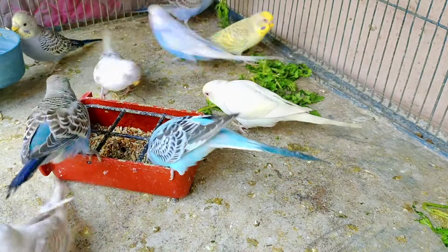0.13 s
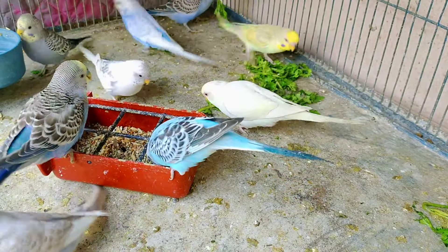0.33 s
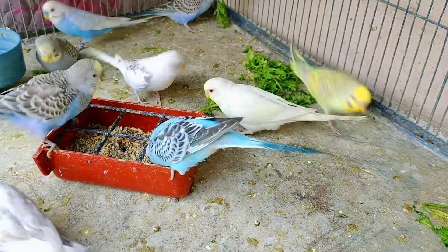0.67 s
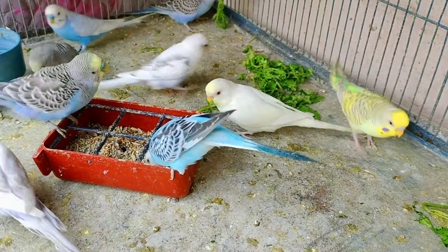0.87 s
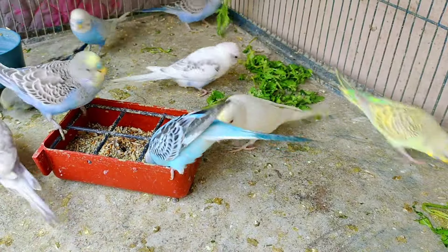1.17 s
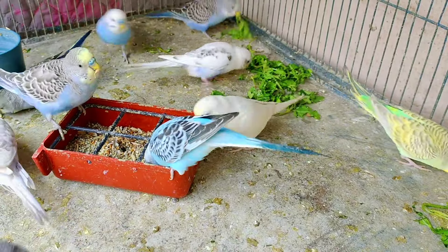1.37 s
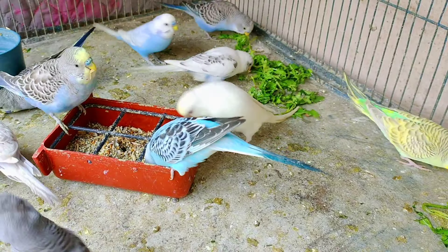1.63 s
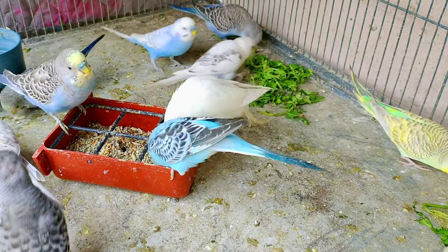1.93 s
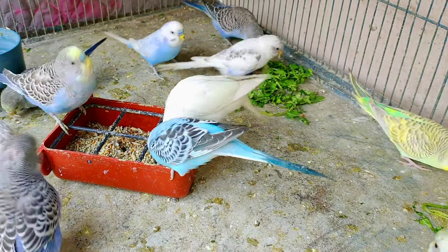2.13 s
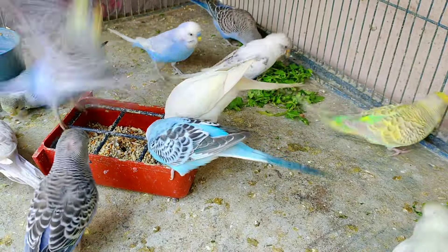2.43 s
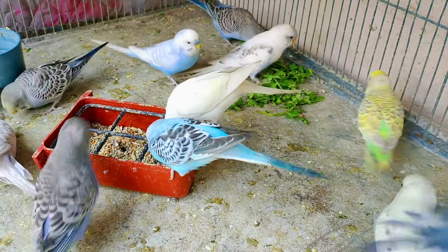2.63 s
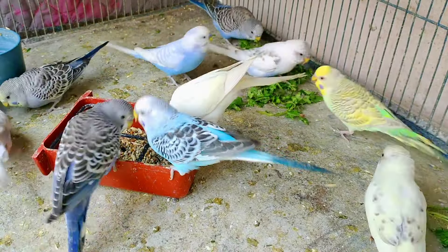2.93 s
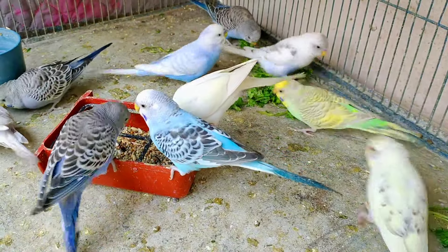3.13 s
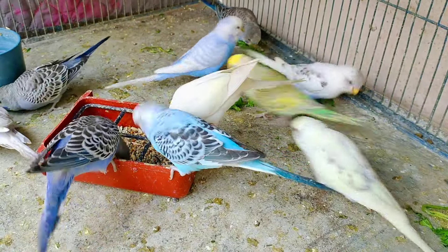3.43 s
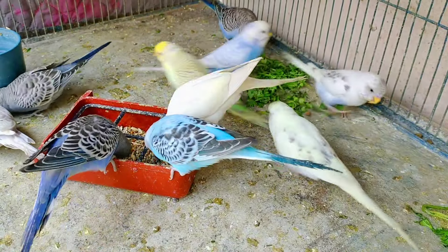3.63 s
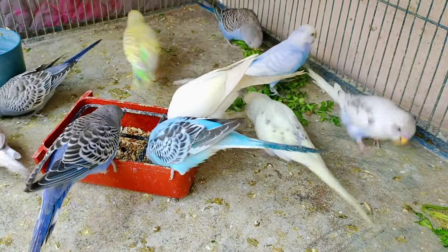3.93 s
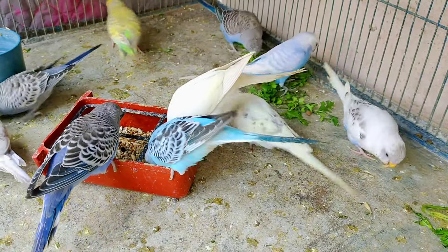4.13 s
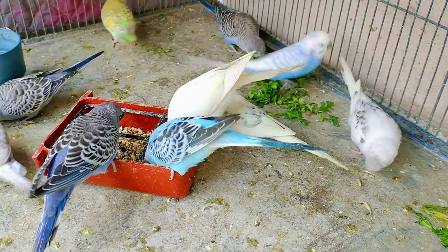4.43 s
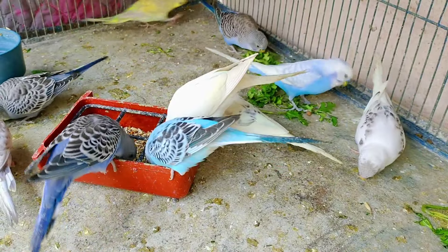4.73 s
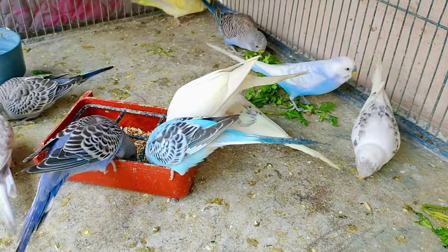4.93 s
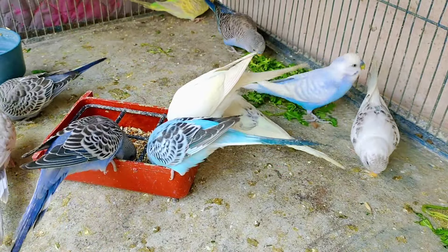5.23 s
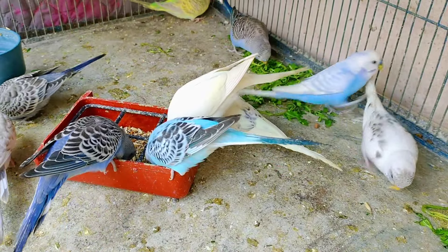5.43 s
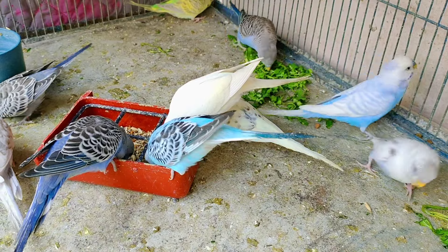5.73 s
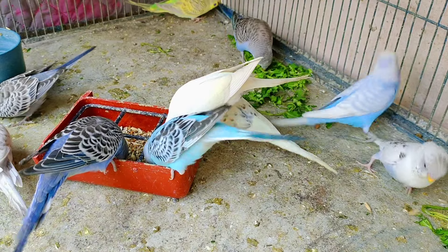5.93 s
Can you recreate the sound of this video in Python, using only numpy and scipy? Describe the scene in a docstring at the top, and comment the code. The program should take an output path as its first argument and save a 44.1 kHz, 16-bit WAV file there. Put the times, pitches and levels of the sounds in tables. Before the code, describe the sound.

Budgerigars feed close to the microphone in a small aviary with slight reverberation and faint, bassy outdoor air. At 0 s the tail of a distant rooster's crow fades under a beak knock. Irregular taps on a plastic tray continue, most steadily from 0.3 to 1.6 s, with seed rustling and faint hoarse bird calls far away. Husks crackle around 1.7 s and a sharp knock lands at 1.9 s; then it is sparser. Around 2.6-3.1 s wings whirr and thump softly as a bird lands, amid stirred seed and firmer pecks. A quick raspy chirp comes at 3.35 s. Crisp husk cracks cluster at 3.5-3.7 s, with the loudest snap at 4.0 s. A brighter, sharper chirp follows at 4.45 s. From 4.6 to 5.8 s a rooster crows faintly over dwindling pecks and ticks. A last knock at 5.9 s meets a tiny chirp.

```python
"""In an aviary with a concrete floor, budgerigars feed from a plastic seed tray.
Beaks knock and husks crack: grains and noise bursts through short resonances.
Feet stir seed (drifting spurts of clicks), wings whirr past (pulsed, filtered noise).
One bird chirps close by; far off, birds call hoarsely and a rooster crows (gliding harmonic tones)."""
import sys
import numpy as np
from scipy import signal
from scipy.fft import rfft, irfft
from scipy.io import wavfile
from scipy.ndimage import uniform_filter1d

SR = 44100
rng = np.random.default_rng(int(sys.argv[2]) if len(sys.argv) > 2 else 0)


def master_out(mix):
    """Clip the mix to full scale and print it as 16-bit PCM to the path in sys.argv[1]."""
    frames = np.transpose(np.atleast_2d(mix))
    ceiling = np.clip(frames, -1, 1)
    pcm = np.round(ceiling * 32767).astype(np.int16)
    wavfile.write(sys.argv[1], SR, pcm)


N = 268921
TIME = np.arange(N) / SR


def undb(db):
    """Decibels to amplitude gain."""
    return 10 ** (np.asarray(db) / 20)


def unit(x):
    """Scale to rms 1."""
    return x / np.sqrt(np.mean(x ** 2) + 1e-20)


def add(out, start_s, sound):
    """Mix a short sound in at start_s."""
    start = max(int(start_s * SR), 0)
    out[start:start + len(sound)] += sound[:N - start]


def noise(size=N):
    """White noise, rms about 1."""
    return rng.standard_normal(size)


def decay(t, t60_s):
    """Exponential decay: 60 dB in t60_s."""
    return np.exp(-np.log(1000) * t / t60_s)


def low_pass(x, hz, order):
    """Butterworth low-pass."""
    return signal.sosfilt(signal.butter(order, hz, fs=SR, output="sos"), x)


def colour(x, spectrum):
    """Minimum-phase filter through the (hz, db) points, unit power gain."""
    hz, db = np.transpose(spectrum)
    f = np.fft.rfftfreq(4096, 1 / SR)
    gain_db = np.interp(np.log(f + 1), np.log(hz), db)
    gain_db -= 11.0 * np.log2(np.maximum(f / hz[-1], 1))  # per octave above the last point
    cepstrum = irfft(np.log(undb(gain_db)))
    half = len(cepstrum) // 2
    cepstrum[1:half] *= 2  # fold to make it causal
    cepstrum[half + 1:] = 0
    response = irfft(np.exp(rfft(cepstrum)))
    return signal.fftconvolve(x, response / np.linalg.norm(response))[:N]


def wander(hz, size=N):
    """Smooth random curve, rms 1, changing about hz times a second."""
    k = max(int(SR / hz), 2)
    return unit(uniform_filter1d(uniform_filter1d(noise(size), k), k))


def grains(rate_hz, spread_db, size=N):
    """Random tiny clicks of uneven size, rms 1."""
    strength = undb(spread_db * np.minimum(rng.exponential(size=size), 4))
    return unit((rng.random(size) < rate_hz / SR) * strength * noise(size))


def burst(t60_s, rise_s):
    """Quarter-second envelope: quick rise, exponential decay."""
    t = TIME[:SR // 4]
    return (1 - np.exp(-t / rise_s)) * decay(t, max(t60_s, .005))


def envelope(t, length_s, attack_s, release_s):
    """Linear rise, hold until length_s, exponential release."""
    return np.clip(t / attack_s, 0, 1) * np.exp(-np.clip((t - length_s) / release_s, 0, 20))


def ring(x, hz, width_hz):
    """One resonance with unit power gain."""
    hz = min(hz, .4 * SR)
    b, a = signal.iirpeak(hz, hz / width_hz, SR)
    return signal.lfilter(b, a, x + 1e-18) * np.sqrt(SR / np.pi / width_hz)


def spot(x, t60_s):
    """Random ring, at most 25 ms: the chance response of one seed or spot on the tray."""
    t = TIME[:SR // 40]
    response = noise(len(t)) * decay(t, t60_s)
    return signal.fftconvolve(x, response / np.linalg.norm(response))[:len(x)]


def room(x, t60_s, wet_db, top_hz):
    """Direct sound plus a diffuse, duller tail from 4 ms on."""
    t = TIME[:SR]
    tail = low_pass(noise(SR) * decay(t, t60_s) * (t > .004), min(top_hz, SR / 3), order=1)
    wet = undb(wet_db)
    reverb = signal.fftconvolve(x, tail / np.linalg.norm(tail))[:N]
    return (x + wet * reverb) / np.sqrt(1 + wet ** 2)


DULLING = 0.16  # share of the fade added per octave of partial number


def syrinx(notes, shape, partials_db, throat, waver_db, flutter_hz, jitter, shimmer):
    """Harmonics through a throat; the period glides fast, then settles; roughness shakes pitch and level."""
    out, t = np.zeros(N), TIME[:SR]
    glide_s, attack_s, release_s = shape
    throat_hz, throat_db = np.transpose(throat)
    for start_s, length_s, start_hz, end_hz, level_db, fade_db, roughness in notes:
        held = np.minimum(t, length_s)
        settled = np.expm1(-held / glide_s) / np.expm1(-length_s / glide_s)
        hz = 1 / ((1 - settled) / start_hz + settled / end_hz)
        shaken_hz = hz * (1 + jitter * roughness * wander(flutter_hz, size=SR))
        phase = 2 * np.pi * np.cumsum(shaken_hz) / SR
        fade = fade_db * held / length_s
        gains = []
        for number, partial_db in enumerate(partials_db, start=1):
            gain_db = partial_db + np.interp(number * hz, throat_hz, throat_db)
            gain_db = gain_db + DULLING * fade * np.log2(number)
            gain_db = gain_db + waver_db * wander(2 / glide_s, size=SR)  # each partial wavers alone
            gains.append(undb(gain_db))
        gains = np.array(gains) / np.linalg.norm(gains, axis=0)
        tone = unit(sum(gain * np.sin(number * phase) for number, gain in enumerate(gains, start=1)))
        strength = undb(level_db + fade) * envelope(t, length_s, attack_s, release_s)
        add(out, start_s, tone * strength * (1 + shimmer * roughness * wander(flutter_hz, size=SR)))
    return out


# beak pecks, body and edge relative to level: start_s, level_db, body_db, edge_db, scatter_t60_s
BEAK_PECKS = [(.003, -30.5, -1.5, -19, 0.033), (0.323, -43.5, -22, -6, 0.1), (.379, -40.5, 0, -7.5, 0.094),
              (.468, -51, 2, 6, .06), (.52, -46.5, -8, -33, 0.15), (0.614, -43, 0, -7, 0.061),
              (0.743, -36.5, -21, -10, 0.088), (0.834, -29, -4, -5.5, 0.072),
              (0.922, -42.5, 2.5, -3.5, 0.12), (1.0, -42.5, 5.5, -33, 0.045), (1.069, -38.5, -2, -36, .07),
              (1.103, -38.5, 2, -33, 0.12), (1.194, -44.5, -2, 0, 0.03), (1.253, -44.5, 0, -9, 0.079),
              (1.315, -43, 1, -39, 0.081), (1.341, -44, 11.5, -36, 0.13), (1.354, -36, -2, -45, 0.053),
              (1.489, -42, 1.5, -8, 0.085), (1.622, -51.5, -6.5, -24, 0.25), (1.864, -42, -33, -20, 0.058),
              (1.912, -26, -25, -33, 0.021), (1.944, -41.5, -5, 3.5, 0.019), (2.333, -55, -17, 5, 0.07),
              (2.542, -44, -11, -24, 0.19), (2.597, -46.5, 14, 1, 0.16), (2.643, -44, 1.5, 1.5, 0.17),
              (2.803, -38.5, -1, -3, 0.18), (2.863, -27.5, -5.5, -4, 0.079), (2.972, -44, 11, -17, 0.098),
              (3.112, -44, 0, -18, 0.086), (3.148, -29, -40, -23, 0.038), (3.207, -44, -3, 4, 0.047),
              (3.245, -27.5, -18.5, -39, 0.047), (3.582, -38.5, -1, -16, 0.18),
              (3.675, -32.5, -13.5, -42.5, 0.044), (3.811, -38.5, -7, -15, 0.042),
              (3.855, -35, -5, -10.5, 0.077), (3.909, -41.5, 1, -27, 0.075), (4.004, -33.5, -2, -26, 0.14),
              (4.09, -38, -1.5, -9, .086), (4.146, -49, 10, -38, 0.047), (4.165, -57, -7, -19, 0.017),
              (4.188, -38, -28, -20, 0.032), (4.237, -37.5, 0.5, 1, 0.043), (4.289, -41, 6, -12, 0.055),
              (4.808, -40.5, -6.5, -10, 0.094), (4.837, -38, -2, -5, 0.054), (4.936, -39.5, 0, -8.5, 0.055),
              (4.957, -34.5, -0.5, -9.5, 0.046), (4.984, -40, 3.5, -6, 0.067),
              (5.029, -38, -3.5, -40, 0.069), (5.171, -45, -22, -13.5, 0.28), (5.332, -36, -21, -21, 0.084),
              (5.441, -45, -12.5, -7, 0.25), (5.864, -30, -5, -47, 0.064)]
# tray resonances: centre_hz, width_hz, relative_db
TRAY_MODES = [(1381, 40, 7), (1740, 720, -21.5), (2244, 240, 3.5), (2537, 120, 3.5), (2865, 93, 7.5),
              (3260, 220, 3), (3880, 220, -16.5)]
# knock spectrum: hz, db_per_hz
PECK_SPECTRUM = [(600, -33.5), (1100, -2.5), (2000, 14), (3300, 6.5), (4300, 13), (5500, -19.5),
                 (8000, -52.5)]
# tray body spectrum: hz, db_per_hz
BODY_SPECTRUM = [(150, -10.5), (350, 1), (700, 14), (1000, 6), (1600, -39)]
# bright seed edge spectrum, also for stirred seed: hz, db_per_hz
EDGE_SPECTRUM = [(3000, -27), (4800, 11), (6500, 14), (7500, 11.5), (9000, -35.5)]
KNOCK_HZ, KNOCK_SPREAD_OCT = 2210, 0.56  # each peck lands on another spot of the tray


def pecks(knock_db=-5, body_db=-4, edge_db=-4, tray_db=-5, pitch_db=-4, pitch_width_hz=350):
    """Each peck scatters seeds against the tray, which rings briefly."""
    knock, pitched, body, edge = np.zeros((4, N))
    for start_s, level_db, peck_body_db, peck_edge_db, t60_s in BEAK_PECKS:
        hz = KNOCK_HZ * 2 ** (KNOCK_SPREAD_OCT * rng.standard_normal())
        shape = burst(t60_s, rise_s=0.0025)
        seeds = grains(rate_hz=9000, spread_db=3.3, size=len(shape)) * shape * undb(level_db)
        blow = spot(seeds, t60_s=.011)
        add(knock, start_s, blow)
        add(pitched, start_s, ring(seeds, hz, pitch_width_hz))
        add(body, start_s, seeds * undb(peck_body_db))
        add(edge, start_s, blow * undb(peck_edge_db))
    tray = sum(undb(db + tray_db) * ring(knock, hz, width_hz) for hz, width_hz, db in TRAY_MODES) / 2
    # soft plastic passes little treble; the hard seed adds a bright edge
    middle = low_pass(colour(knock, PECK_SPECTRUM) + tray + undb(pitch_db) * pitched, 4700, order=5)
    low = undb(body_db) * colour(body, BODY_SPECTRUM)
    bright = undb(edge_db) * colour(edge, EDGE_SPECTRUM)
    return undb(knock_db) * middle + low + bright


# cracking husks, snap relative to splinters: start_s, splinters_db, snap_db, ring_hz
HUSK_CRACKS = [(0.103, -45, 0, 6600), (.191, -32, -6, 6360), (0.232, -35.5, 0, 4300), (0.549, -42, 8, 6560),
               (1.461, -48, 3, 6700), (1.661, -31.5, -6, 5650), (1.765, -38, -5, 5570),
               (1.785, -30.5, -11, 6140), (1.811, -36.5, -3, 6200), (2.061, -49, 5, 6200),
               (2.135, -43, -11, 5860), (2.396, -50.5, -7, 5640), (2.441, -47, -9, 6030),
               (2.474, -51.5, -3, 6730), (2.972, -38.5, 12.5, 3600), (3.05, -40, -4, 6470),
               (3.316, -40, -2, 3700), (3.52, -26, 14.5, 6330), (3.56, -35, -3, 3760),
               (3.591, -30.5, -1, 6470), (3.621, -28, 3, 6540), (3.684, -31, -2, 6980),
               (3.73, -27.5, 4.5, 6830), (4.003, -16.5, 8.5, 3460), (4.219, -43.5, 9, 5830),
               (4.286, -33, -6, 5560), (4.63, -37, -5, 5700), (4.77, -33, 17, 6000),
               (5.224, -40.5, 20.5, 6330), (5.458, -48, -3.5, 4630), (6.063, -43, 23, 5200)]
# splitting husk spectrum: hz, db_per_hz
HUSK_SPECTRUM = [(800, -13), (2000, -8.5), (3500, -2.5), (6500, -1.5), (7500, -4.5), (9000, -20.5)]
SPLINTER_T60_S = 0.05
SHELL_CUT = 0.37  # a small shell radiates little below this share of its ring pitch


def husks(crack_db=-6, ring_db=-5, ring_width_hz=400):
    """A husk splits with one broad snap and a short run of thin splinters; the shell rings."""
    cracks, shells = np.zeros((2, N))
    shape = burst(SPLINTER_T60_S, rise_s=0.0025)
    click = burst(0.004, rise_s=0.0011)
    for start_s, splinters_db, snap_db, ring_hz in HUSK_CRACKS:
        snap = undb(splinters_db + snap_db) * click * noise(len(click))
        splinters = undb(splinters_db) * shape * grains(rate_hz=4700, spread_db=-0.5, size=len(shape))
        high_pass = signal.butter(2, SHELL_CUT * ring_hz, "high", fs=SR, output="sos")
        add(cracks, start_s, snap + signal.sosfilt(high_pass, spot(splinters, t60_s=.006)))
        add(shells, start_s, ring(snap + splinters, ring_hz, ring_width_hz))
    return undb(crack_db) * (colour(cracks, HUSK_SPECTRUM) + undb(ring_db) * shells)


# bouts of seed stirred by feet and beaks: start_s, length_s, level_db, treble_db
STIR_BOUTS = [(0, 0.26, -51, -56), (0.362, 0.37, -52, -58), (0.706, 0.25, -48.5, -60),
              (1.003, .3, -54, -73), (1.608, .29, -59.5, -55), (2.536, 0.11, -45, -66),
              (2.698, 0.18, -42, -43.5), (2.954, 0.046, -53, -65), (3.126, .11, -46, -65),
              (3.332, .22, -50, -47), (3.6, 0.21, -52, -75), (3.825, 0.44, -55.5, -64),
              (4.077, .3, -47.5, -61), (4.507, 0.28, -56, -63), (4.777, 0.29, -59, -80),
              (5.741, 0.17, -52.5, -58), (6, .12, -65, -64)]
# stirred seed spectrum, also for brushed feathers: hz, db_per_hz
STIR_SPECTRUM = [(150, -3.5), (400, -8), (750, 4), (1200, 2), (2600, 3.5), (3800, -3.5), (5000, -7.5),
                 (8000, -10)]
STIR_ATTACK_S, STIR_RELEASE_S = 0.0087, 0.019


def stirring(mid_db=-3, treble_db=-3, ring_db=-11, ring_width_hz=260, spot_count=10):
    """Loose seed shifts in small spurts, now at one spot, now at another, each with its own pitch."""
    middle, treble = np.zeros((2, N))
    for start_s, length_s, level_db, high_db in STIR_BOUTS:
        bout = envelope(TIME - start_s, length_s, STIR_ATTACK_S, STIR_RELEASE_S)
        middle += undb(level_db) * bout
        treble += undb(high_db) * bout
    turns = [undb(16 * wander(25)) for _ in range(spot_count)]
    ticks = [spot(grains(rate_hz=1100, spread_db=3), t60_s=.018) for _ in turns]
    pitches_hz = np.geomspace(800, 7000, spot_count) * (1 + .06 * noise(spot_count))
    spurts = np.zeros(N)
    for turn, tick, hz in zip(turns, ticks, pitches_hz):
        spurts += turn * (tick + undb(ring_db) * ring(tick, hz, ring_width_hz))
    swell = undb(11.0 * np.tanh(wander(40)))
    seeds = unit(spurts / np.linalg.norm(turns, axis=0) * swell)
    dull = colour(seeds * middle * undb(mid_db), STIR_SPECTRUM)
    return dull + colour(seeds * treble * undb(treble_db), EDGE_SPECTRUM)


# flurries of wing beats: start_s, length_s, air_db
WING_FLURRIES = [(0.214, .04, -55), (0.827, 0.15, -43), (1.016, 0.064, -49), (1.382, 0.029, -53),
                 (1.806, 0.032, -60), (2.4, 0.043, -67), (2.6, 0.19, -47), (2.737, 0.15, -37),
                 (2.918, 0.12, -41.5), (3.077, 0.17, -57), (3.44, 0.087, -60.5), (3.89, 0.036, -55),
                 (4.071, 0.032, -63), (4.237, 0.15, -45), (4.521, 0.15, -47.5), (4.704, 0.17, -62),
                 (4.987, 0.073, -64.5), (5.8, 0.028, -65.5)]
# pushed air spectrum: hz, db_per_hz
WING_SPECTRUM = [(25, -22.5), (60, -11.5), (90, 3), (120, 7.5), (155, 1.5), (195, 5), (280, -9),
                 (450, -18.5), (1000, -17.5), (2000, -51)]
# close wing strokes as a bird lands on the tray: start_s, level_db
CLOSE_STROKES = [(2.768, -25), (2.788, -28.5), (2.806, -24), (2.864, -26), (2.9, -32.5)]
# close stroke spectrum: hz, db_per_hz
STROKE_SPECTRUM = [(25, -4.5), (60, -10), (110, 5), (160, -4.5), (450, -1.5), (700, -9.5), (1500, -24)]
WING_ATTACK_S, WING_RELEASE_S = 0.029, 0.027


def wings(air_db=-1, mean_beat_hz=24, depth=0.31, feather_db=-17, stroke_db=-1, stroke_t60_s=0.093):
    """Every wing beat pushes a puff of air and brushes the feathers; the closest strokes thump."""
    effort = sum(undb(db) * envelope(TIME - start_s, length_s, WING_ATTACK_S, WING_RELEASE_S)
                 for start_s, length_s, db in WING_FLURRIES)
    beat_hz = mean_beat_hz * (1 + 0.0937 * wander(3.58))
    beat = unit(1 + depth * np.sin(2 * np.pi * np.cumsum(beat_hz) / SR))
    air = colour(noise(), WING_SPECTRUM) * beat * effort * undb(air_db)
    feathers = colour(noise(), STIR_SPECTRUM) * beat ** 2 * effort * undb(feather_db)
    strokes, puff = np.zeros(N), burst(stroke_t60_s, rise_s=0.0035)
    for start_s, level_db in CLOSE_STROKES:
        add(strokes, start_s, undb(level_db + stroke_db) * puff * noise(len(puff)))
    return air + feathers + colour(strokes, STROKE_SPECTRUM)


# chirp notes, flicks and long downward slurs that end in a rasp:
# start_s, length_s, start_hz, end_hz, level_db, fade_db, roughness
CHIRP_NOTES = [(3.343, .012, 3810, 3675, -33, 3.5, 0.2), (3.354, 0.011, 3750, 4700, -34.5, -5, 0.65),
               (3.367, 0.02, 3270, 5020, -33, -8, 0.43), (3.385, 0.061, 4940, 1583, -38, 1, 0.19),
               (3.451, 0.045, 3040, 2200, -33.5, -11.5, 0.48), (3.501, 0.023, 1874, 1667, -39, -0.5, 0.73),
               (4.425, 0.0094, 4510, 3410, -39.5, 11.5, .35), (4.449, 0.0065, 2730, 5070, -24, -7.5, 0.2),
               (4.458, 0.067, 4585, 1660, -29, -11, 0.21), (4.515, .011, 1527, 2910, -40.5, 1.5, 1.11),
               (4.525, 0.0088, 3230, 2710, -21.5, -7.5, 0.23), (4.534, 0.042, 2685, 2383, -27, -18.5, .14),
               (4.567, 0.017, 2160, 1202, -37.5, -2, 1), (4.588, 0.022, 1846, 1125, -45, 7.5, 0.9),
               (5.939, 0.026, 1440, 2948, -38.5, 6.5, 0.05), (5.959, 0.016, 3063, 2584, -30.5, -7.5, .25)]
# note shape: glide_s, attack_s, release_s
CHIRP_TIMING = (.02, 0.0013, 0.00067)
# relative level of partials 1, 2, ...: level_db
CHIRP_HARMONICS = [8, -5, -9, -18]
# budgerigar throat response: hz, gain_db
BUDGERIGAR_THROAT = [(1000, -6.5), (1700, -7.5), (2600, -5), (3600, 4.5), (5200, -4.5), (7000, 4.5),
                     (8500, -23.5)]


def chirps(bounce_db=-9):
    """Close budgerigar calls: fast sweeps that break up into a rasp and bounce off floor and tray."""
    calls = syrinx(CHIRP_NOTES, CHIRP_TIMING, CHIRP_HARMONICS, BUDGERIGAR_THROAT,
                   waver_db=4, flutter_hz=900, jitter=.14, shimmer=.9)
    return calls + undb(bounce_db) * spot(calls, t60_s=0.021)


# distant hoarse bird calls: start_s, length_s, start_hz, level_db, second_partial_db
DISTANT_CALLS = [(0.386, 0.21, 404.6, -57.5, -0.5), (0.605, 0.079, 386.3, -50, -23),
                 (0.726, 0.17, 388, -52.5, -5.5), (1.059, .13, 432.4, -49, 5),
                 (1.141, 0.13, 335.4, -61, 13), (1.325, 0.1, 339, -50, -12), (1.452, 0.076, 389, -62, 7),
                 (1.77, 0.038, 374, -57.5, -31), (3.2, 0.047, 395, -57, 4), (3.286, 0.019, 370, -63.5, -12),
                 (3.591, 0.088, 361.7, -53.5, -8), (3.752, 0.033, 353, -56.5, -24),
                 (3.843, 0.206, 810, -58.5, -23), (3.985, 0.11, 587, -55, -1),
                 (4.334, 0.25, 794, -58.5, -17), (4.8, 0.068, 708, -54.5, -26),
                 (4.863, 0.084, 623.5, -53, -5), (5.536, .15, 689, -59, 18), (5.823, 0.037, 306, -59.5, -1),
                 (5.864, 0.061, 560, -59, -3.5)]
CALL_SAG, CALL_ROUGHNESS = 0.1228, 0.44  # share of its pitch that a call loses; hoarseness 0-1


def distant_calls(third_db=-14):
    """Three hoarse harmonics sag in pitch, blurred by the yard between."""
    out, shake, rasp = np.zeros(N), wander(170), wander(200)
    for start_s, length_s, start_hz, level_db, second_db in DISTANT_CALLS:
        on = (TIME > start_s) & (TIME < start_s + length_s)
        along = (TIME[on] - start_s) / length_s
        hz = start_hz * (1 - CALL_SAG * along) * (1 + .14 * CALL_ROUGHNESS * shake[on])
        phase = 2 * np.pi * np.cumsum(hz) / SR
        upper = np.sin(2 * phase) + undb(third_db) * np.sin(3 * phase)
        tone = np.sin(phase) + undb(second_db) * upper
        swell = np.sqrt(np.abs(np.sin(np.pi * along)))
        out[on] += undb(level_db) * unit(tone * (1 + CALL_ROUGHNESS * rasp[on]) * swell)
    return room(out, t60_s=0.44, wet_db=-6.5, top_hz=3000)


# rooster syllables: start_s, length_s, start_hz, end_hz, level_db, fade_db, roughness
CROW_SYLLABLES = [(0, 0.08, 571, 496, -36, -14.5, 0.84), (.08, 0.15, 498.4, 430.6, -55.5, 0.5, 0.52),
                  (4.605, 0.042, 504, 517, -48.5, 1.5, 0.16), (4.70, 0.076, 539, 609, -49.5, 1.5, 0.1),
                  (4.82, 0.32, 522.7, 463.6, -47.5, -13.5, 0.2), (5.08, 0.37, 587, 604, -57.5, -5, 0.11),
                  (5.25, 0.51, 612, 614.5, -50.5, -9, 0.07), (5.71, .12, 611, 474, -46, -11, 0.53)]
# syllable shape: glide_s, attack_s, release_s
CROW_TIMING = (0.0596, 0.011, 0.028)
# relative level of partials 1, 2, ...: level_db
CROW_HARMONICS = [-6.5, 9, -0.5, -18.5, -17.5, -46, -37, -32, -16.5, -36]
# rooster throat response: hz, gain_db
ROOSTER_THROAT = [(500, -6.5), (1000, 3), (1450, -3), (1850, 2), (3500, 10), (4500, 1), (5500, 4),
                  (6500, 7)]


def rooster():
    """Gliding, rough harmonics through a rooster's throat, blurred by the yard between."""
    crow = syrinx(CROW_SYLLABLES, CROW_TIMING, CROW_HARMONICS, ROOSTER_THROAT,
                  waver_db=1.8, flutter_hz=220, jitter=.09, shimmer=.9)
    return room(crow, t60_s=0.36, wet_db=-9.5, top_hz=5000)


# outdoor air spectrum: hz, db_per_hz
AIR_SPECTRUM = [(18, -37.5), (30, -17.5), (58, 0), (87, -3), (362, -13.5), (418, -23), (656, -13),
                (893, -23.5), (5680, -32), (8710, -38), (11300, -92), (19200, -120)]


def outdoor_air(level_db=-71.5):
    """Faint steady noise, strongest in the bass."""
    return undb(level_db) * unit(colour(noise(), AIR_SPECTRUM))


def scene():
    """The flock in its small enclosure, over distant birds and faint outdoor air."""
    feeding = room(pecks() + husks() + stirring() + wings(), t60_s=0.37, wet_db=-12, top_hz=6000)
    calls = room(chirps(), t60_s=0.54, wet_db=-15.5, top_hz=6100)
    return (feeding + calls + distant_calls() + rooster() + outdoor_air())[None]


def record(dry, top_hz=7900):
    """Steep low-pass at top_hz."""
    low_pass_taps = signal.firwin(101, top_hz, fs=SR, window=("kaiser", 6))
    return signal.fftconvolve(dry, low_pass_taps[None], mode="same")


dry = scene()
out = record(dry)
master_out(out)
```